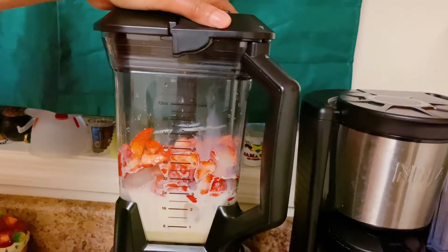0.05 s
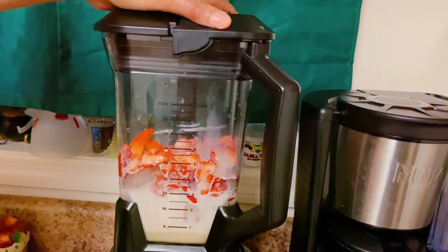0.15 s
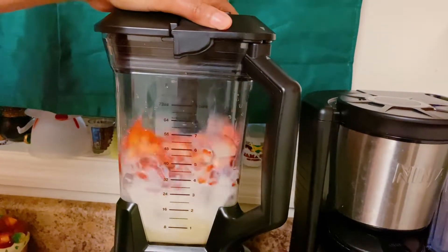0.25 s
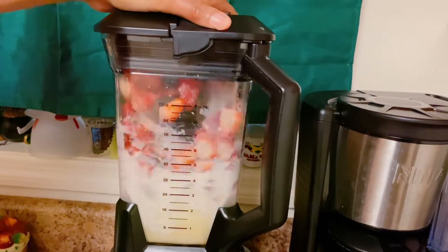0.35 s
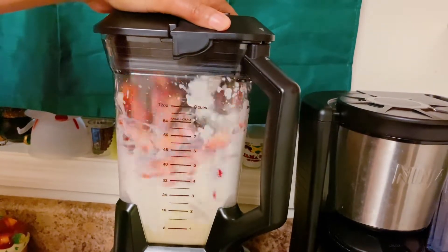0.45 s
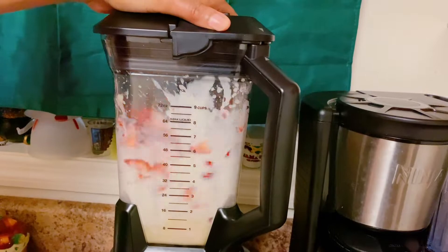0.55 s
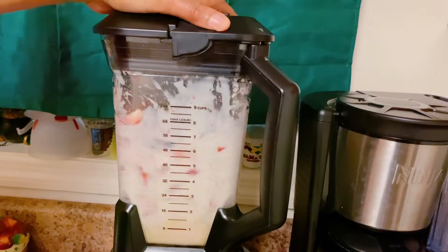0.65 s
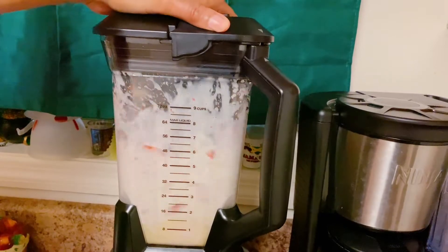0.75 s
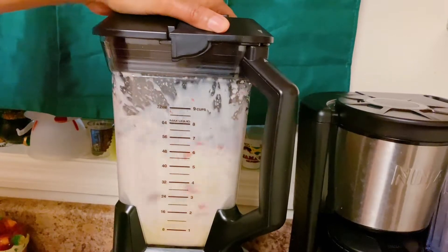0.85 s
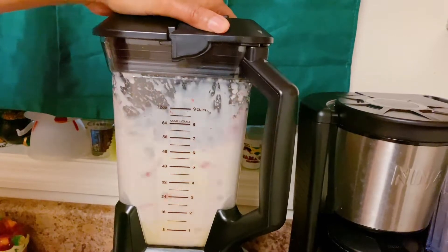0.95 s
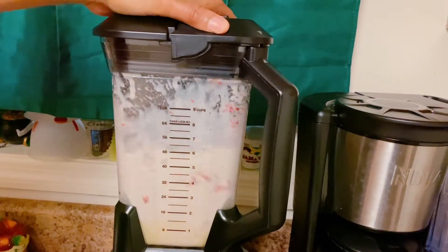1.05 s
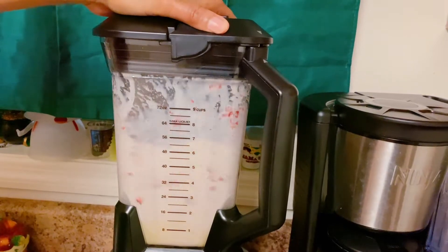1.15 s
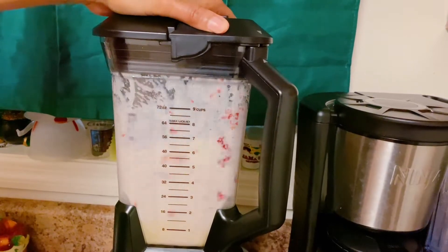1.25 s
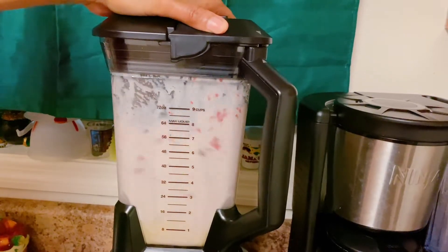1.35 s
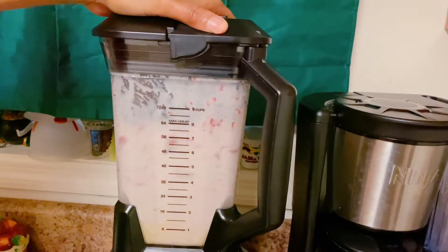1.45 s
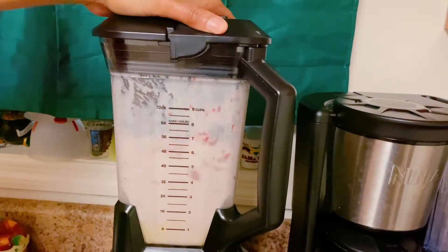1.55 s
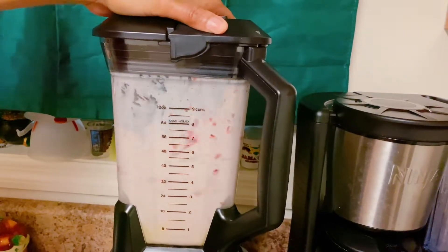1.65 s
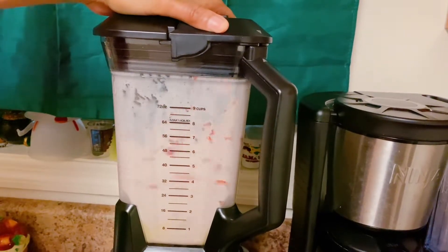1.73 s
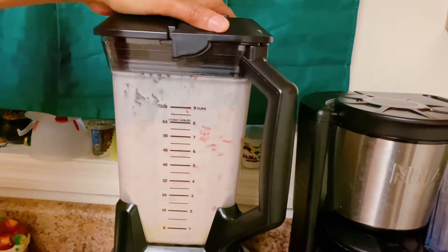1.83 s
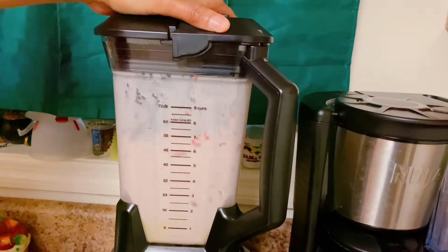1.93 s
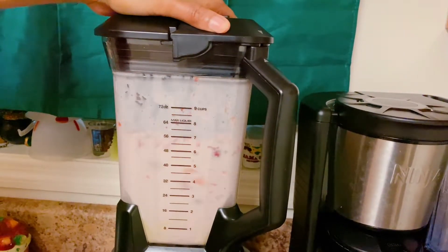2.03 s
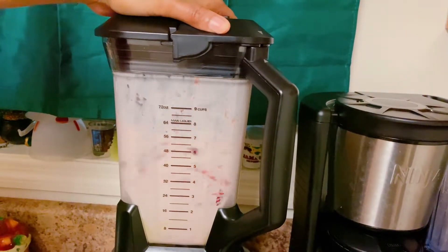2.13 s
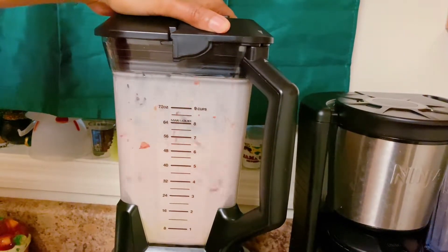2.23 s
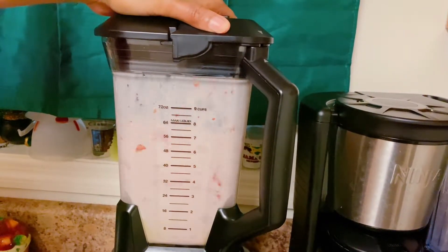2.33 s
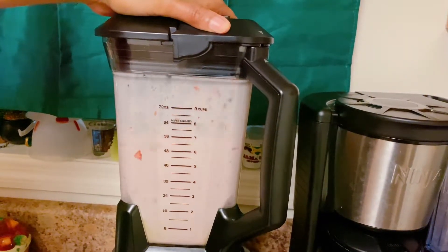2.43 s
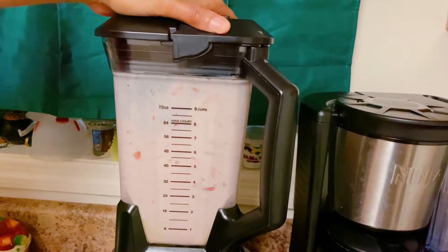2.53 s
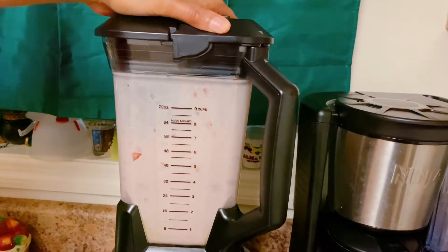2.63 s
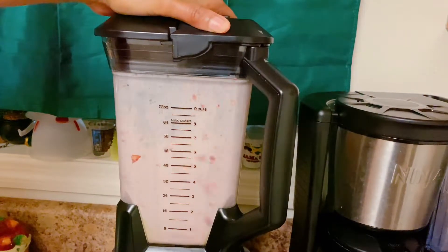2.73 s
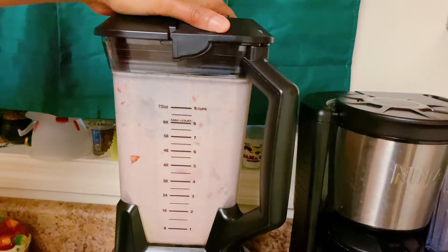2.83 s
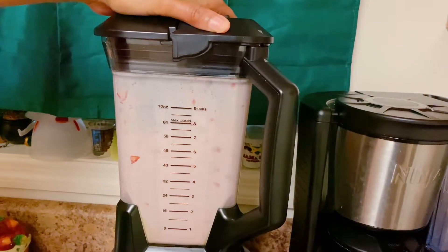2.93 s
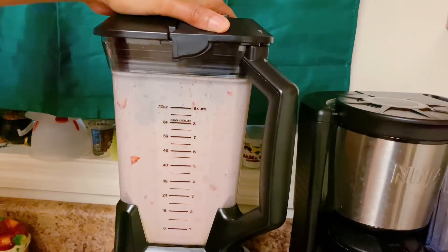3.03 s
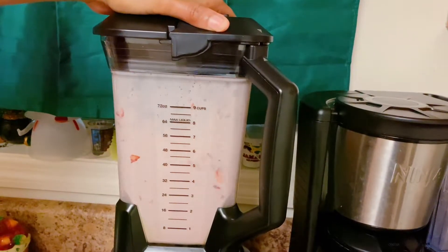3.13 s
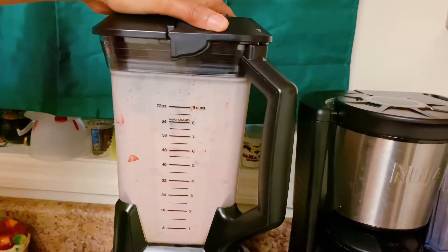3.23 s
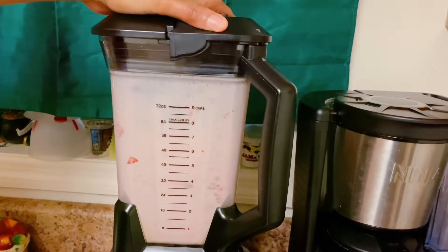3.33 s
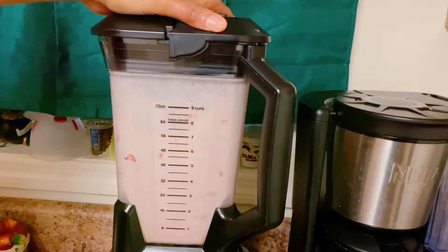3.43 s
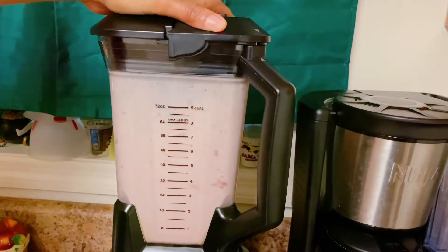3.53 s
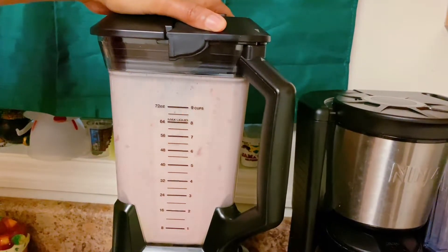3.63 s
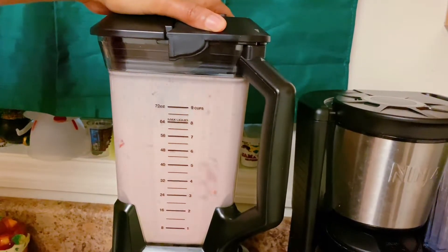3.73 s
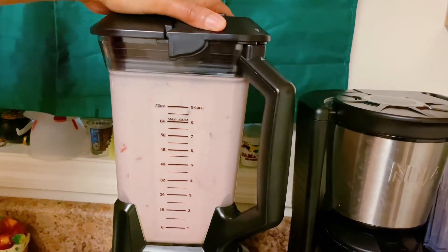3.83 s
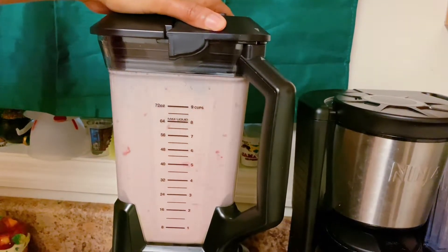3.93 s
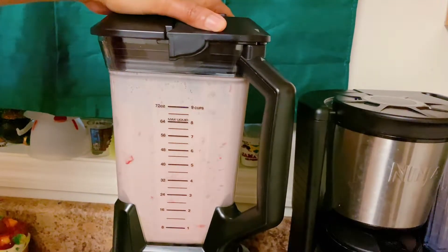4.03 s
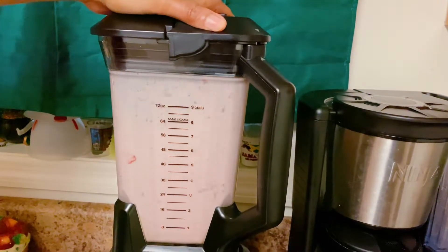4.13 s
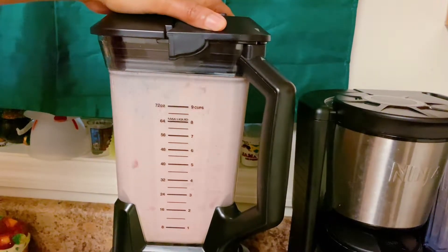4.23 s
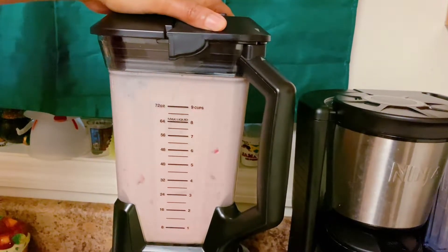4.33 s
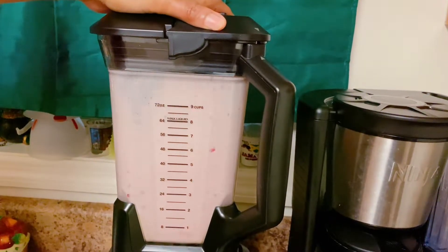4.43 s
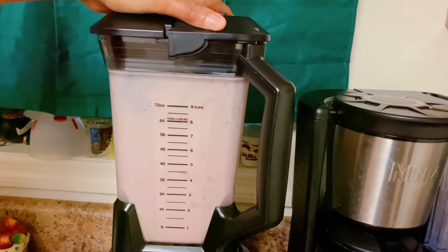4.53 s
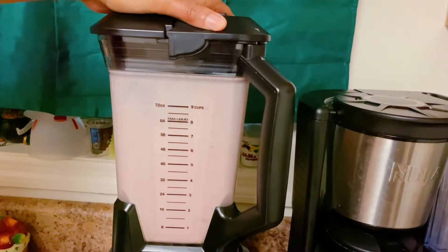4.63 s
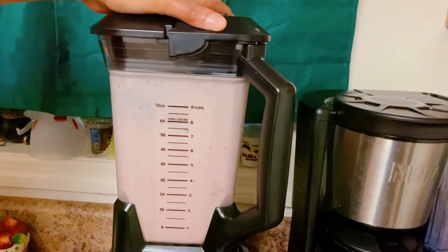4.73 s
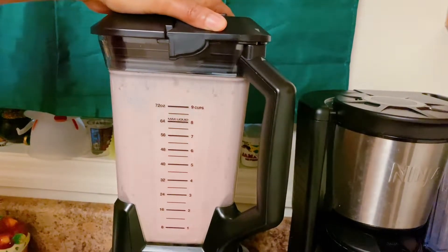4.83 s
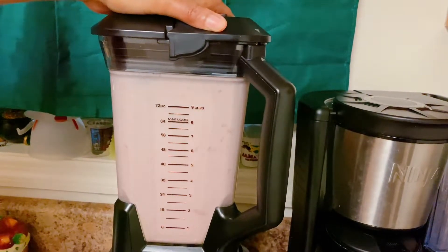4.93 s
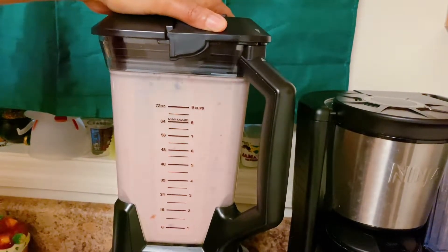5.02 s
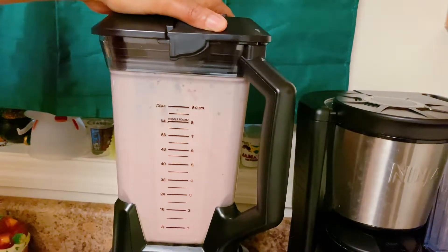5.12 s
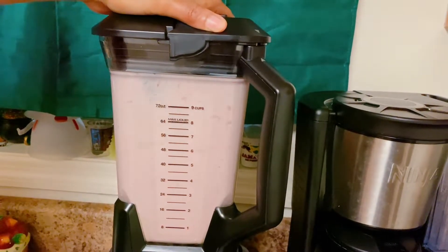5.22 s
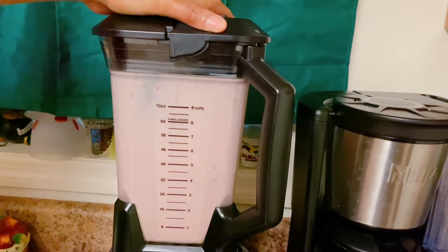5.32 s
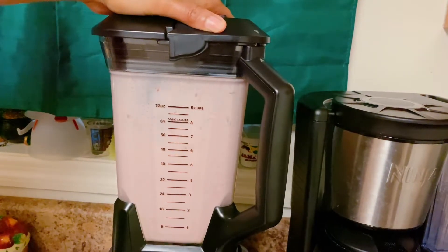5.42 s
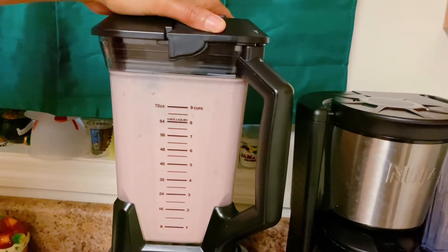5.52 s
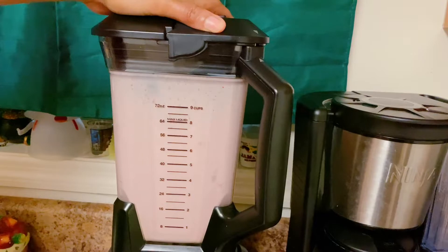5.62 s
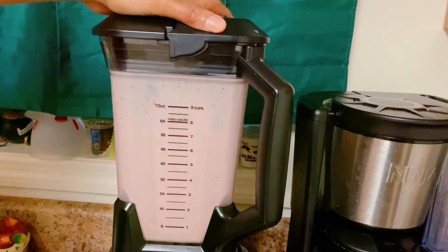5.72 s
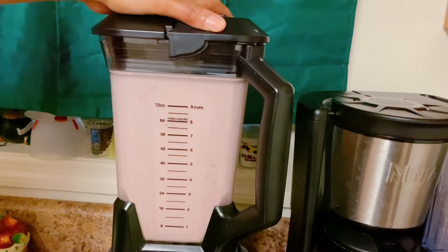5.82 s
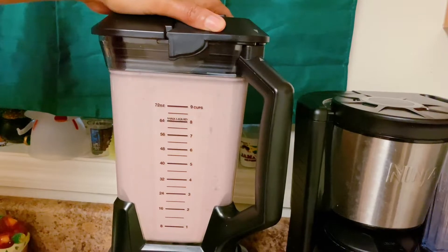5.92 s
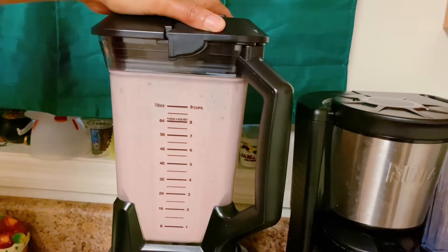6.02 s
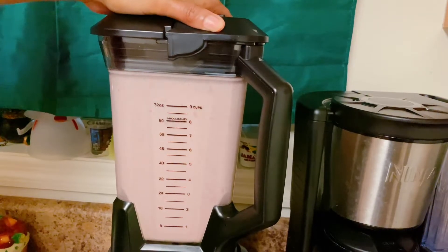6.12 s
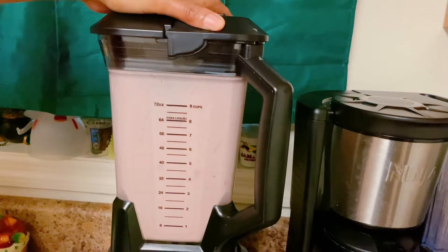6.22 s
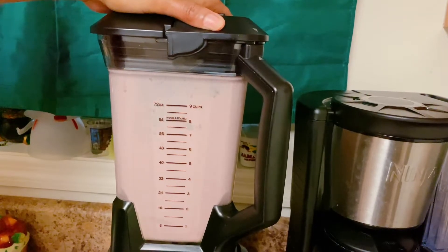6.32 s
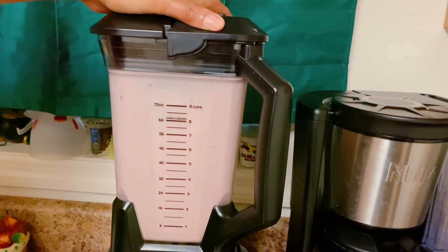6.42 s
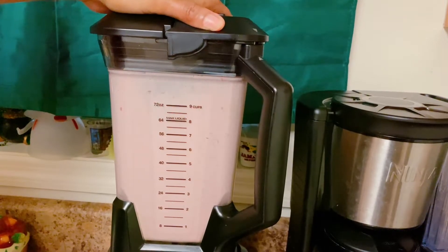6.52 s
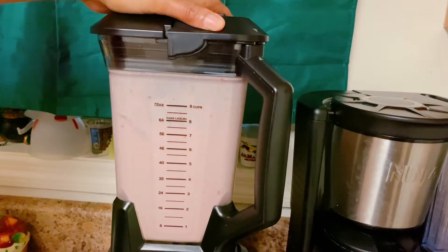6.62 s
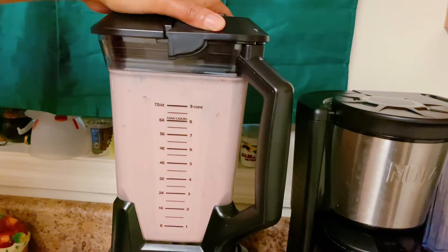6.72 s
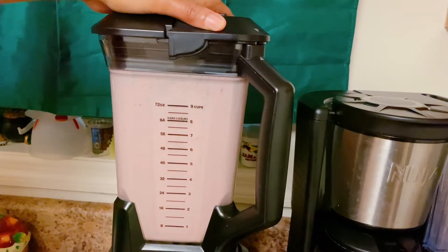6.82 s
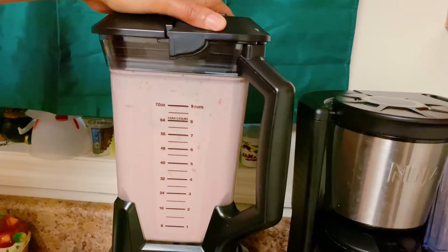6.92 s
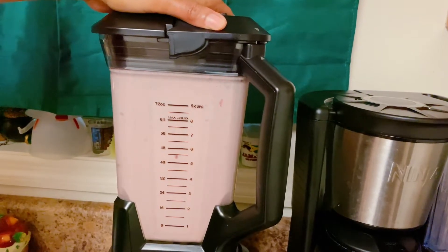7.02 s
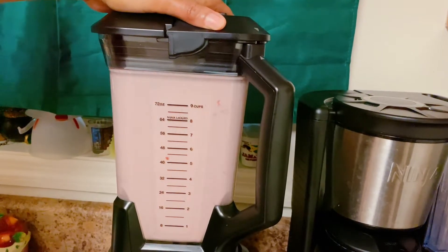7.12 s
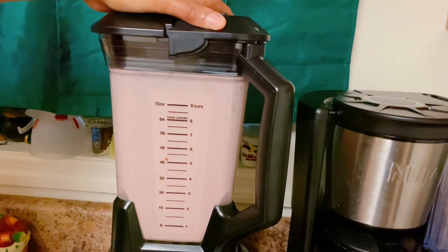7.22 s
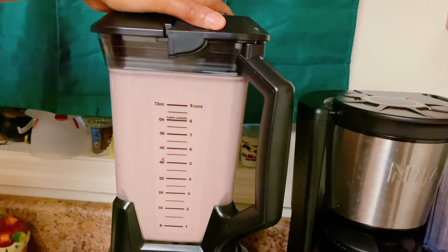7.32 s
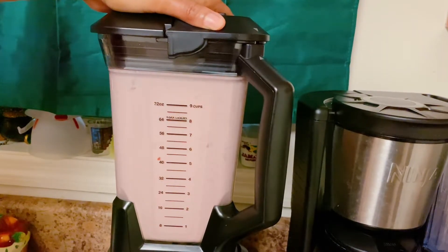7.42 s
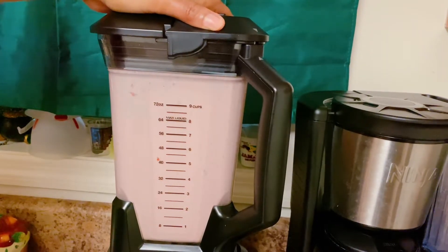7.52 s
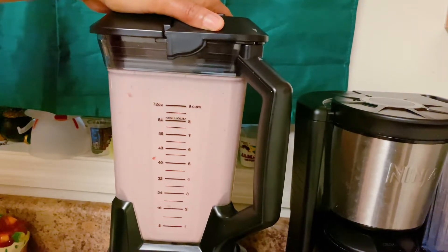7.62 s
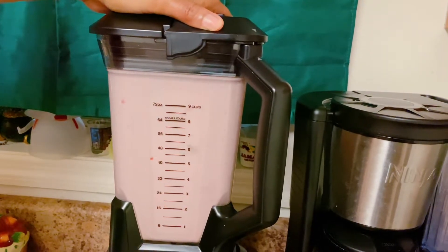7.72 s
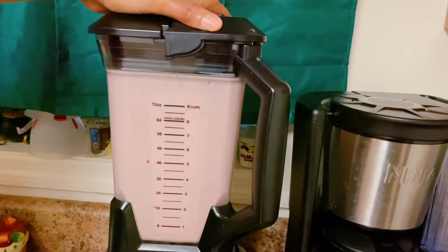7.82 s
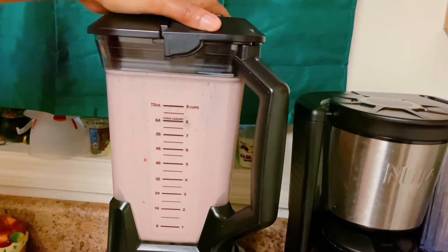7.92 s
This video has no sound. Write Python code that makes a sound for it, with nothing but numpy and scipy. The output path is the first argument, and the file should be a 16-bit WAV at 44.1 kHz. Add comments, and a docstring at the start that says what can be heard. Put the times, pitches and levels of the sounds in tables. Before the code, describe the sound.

Close up in a kitchen, a blender snaps on, crunches through ice, and roars steadily, its whine throbbing and dipping as the mix thickens.

```python
"""A countertop blender in a kitchen, close to a stereo microphone: a switch clicks, the motor spins up, ice smashes.
The whine is sine partials locked to the rotor speed; it rises, and drops as the vortex gulps.
Each gulp flares the churning roar, which is banded noise coloured by the jar's resonances.
Ice blows are clicks that ring the jar's modes. Near surfaces send echoes; behind lie fridge hum and room air."""
import sys
import numpy as np
from scipy import signal
from scipy.fft import rfft, irfft
from scipy.io import wavfile
from scipy.ndimage import uniform_filter1d

SR = 44100
rng = np.random.default_rng(int(sys.argv[2]) if len(sys.argv) > 2 else 0)


def put_to_file(sound):
    """Save the sound as 16-bit audio at rate SR, in the file named by the first command-line argument."""
    columns = np.atleast_2d(sound).T  # one column per channel
    safe = np.clip(columns, -1, 1)
    whole_steps = np.round(safe * 32767)
    wavfile.write(sys.argv[1], SR, whole_steps.astype(np.int16))


N = 351036   # samples in the scene

# The motor spins up through the ice. Each row: time in seconds, rotor speed in Hz, whine in dB,
# roar in dB before the jar's make-up gain, ice rattle in dB before it fades.
SPIN_UP = [(.195, 70.4, -37, -24, -15), (.29, 111.7, -34.5, -29, -19.5), (.42, 218, -29, -29.5, -24.5),
           (.46, 234.7, -33, -29, -28.5), (.53, 262.4, -22, -28, -28), (.62, 279.3, -36, -27.5, -25),
           (.83, 301.3, -30.5, -28, -34), (.95, 309.3, -40, -30.5, -30.5)]
# How alike the two microphone ports hear a sound. Each row: frequency in Hz, likeness from 0 to 1.
PORT_LIKENESS = [(100, 1), (290, 0.63), (640, 0.54), (1400, 0.11), (5000, 0.1), (8000, 1), (15000, 0.86)]


def from_db(db):
    """Amplitude gain of a level in dB."""
    return 10 ** (np.asarray(db) / 20)


def rms_one(x):
    """Scale to rms 1."""
    return x / np.sqrt(np.mean(x ** 2) + 1e-20)


def in_time(rows):
    """Columns of a curve whose first column is seconds, one value a sample."""
    s, *columns = np.transpose(rows)
    return [np.interp(np.arange(N) / SR, s, column) for column in columns]


def at_hz(points, hz):
    """Read a spectrum on a log frequency axis."""
    point_hz, values = np.array(points).T
    return np.interp(np.log(hz), np.log(point_hz), values)


def drift(rate_hz):
    """Slow random wander with rms 1: noise through two equal low-pass poles."""
    step = 40   # samples between computed values
    r = np.exp(-2 * np.pi * step * rate_hz / SR)
    noise = rng.standard_normal(N // step + 2002)
    slow = signal.lfilter([1], [1, -2 * r, r * r], noise)[2000:]   # drop the filter's start
    return np.interp(np.arange(N) / step, np.arange(len(slow)), rms_one(slow))


def ring(clicks, hz, t60):
    """A unit click sets off a sine of height 1 that dies by 60 dB in t60 seconds."""
    r, w = from_db(-60 / (t60 * SR)), 2 * np.pi * hz / SR
    return signal.lfilter([0, np.sin(w)], [1, -2 * r * np.cos(w), r * r], clicks + 1e-18)


def boost(x, hz, width_hz, db):
    """Lift a resonance out of the noise by adding its band-passed copy."""
    r, w = np.exp(-np.pi * width_hz / SR), 2 * np.pi * hz / SR
    peak = signal.lfilter([(1 - r * r) / 2, 0, (r * r - 1) / 2], [1, -2 * r * np.cos(w), r * r], x)
    return x + (from_db(db) - 1) * peak


def pan(x, db):
    """Two channels, the left louder by db."""
    return x * from_db([[db / 2], [-db / 2]])


def filtered(x, order, hz, kind):
    """Butterworth filter."""
    return signal.sosfilt(signal.butter(order, hz, kind, fs=SR, output="sos"), x)


def whine(rotor_hz, whine_db):
    """Unbalance shakes the base once a turn; a weaker partial an octave up grows as the ice breaks down."""
    octave_db, octave_pan_db = -43, 23   # the octave is heard mostly on the left
    up_to_speed = np.clip(rotor_hz / 310, 0, 1)
    jolts = 1.58 + 6.3 * (1 - up_to_speed)   # ice blows break up the tone while the rotor is slow
    unsteady_hz = rotor_hz * (1 + 0.0014 * jolts * drift(25.0))
    turns = 2 * np.pi * np.cumsum(unsteady_hz) / SR
    first = from_db(whine_db + jolts * drift(32)) * np.sqrt(2) * np.sin(turns)

    grows = np.clip(np.arange(N) / SR / 2, 0, 1)   # over two seconds
    second = from_db(octave_db + 2.1 * drift(14.85)) * grows * np.sqrt(2) * np.sin(2 * turns)
    slowing = np.minimum(np.gradient(rotor_hz) * SR, 0)   # Hz per second
    second = second * from_db(0.011 * slowing)   # the octave fades while the rotor is braked
    return pan(first, 3.2) + pan(second, octave_pan_db)


def shaft(rotor_hz):
    """Wavering tones that follow the speed, come clear at full speed and change balance as the mix thickens."""
    # The blade shaft turns at about a fifth of the rotor's speed and adds faint tones.
    # Each row: multiple of the rotor speed, level in dB in the thin mix, level in dB in the thick mix.
    shaft_tones = [(0.395, -43, -52.5), (0.591, -55.5, -42), (0.801, -48.5, -45), (1.199, -55.5, -47),
                   (1.58, -49.5, -58.5)]
    thin_s, thick_s = 1.46, 5.3   # the mix thickens between these times
    turns, t = 2 * np.pi * np.cumsum(rotor_hz) / SR, np.arange(N) / SR
    tones = 0
    for multiple, thin_db, thick_db in shaft_tones:
        level_db = np.interp(t, [thin_s, thick_s], [thin_db, thick_db]) + 3.05 * drift(6.7)
        phase = multiple * turns + 1.03 * drift(5.2)
        tones = tones + from_db(level_db) * np.sqrt(2) * np.sin(phase)
    return pan(np.clip(t / thin_s, 0, 1) * tones, 4.4)


def thumps(rotor_hz):
    """The base jolts the counter when the rotor is braked: low noise swells with the loss of speed."""
    thump_db = -51   # at a braking of 350 Hz per second, if held
    braking = np.clip(-np.gradient(rotor_hz) * SR / 350, 0, 1.5) ** 2
    swell = signal.lfilter([.0005], [1, -.9995], braking)   # smoothed over some 45 ms
    low = filtered(rng.standard_normal(N), 2, [25, 95], "band")
    return from_db(thump_db) * swell * rms_one(low)


def gulps():
    """The vortex gulps, each braking the rotor: summed loss of speed in Hz, whine swell as gain, roar flare in dB."""
    # Quick throbs first, slower and harder as the mix thickens. Each row: time in seconds, whine swell in dB,
    # width of the swell in seconds, flare of the roar in dB, peak loss of speed in Hz.
    gulp_rows = [(1.012, -25.5, 0.055, 1, 10.2), (1.275, -21, 0.037, 2.5, 6),
                 (1.41, -28, 0.032, -0.5, 0.89), (1.489, -21, 0.033, 1.5, 7.5), (1.7, -22.5, 0.09, 0.5, 5),
                 (1.894, -25, 0.05, 0, 4.76), (2.05, -26, 0.031, 0, 1.9), (2.207, -23.5, 0.042, 2, 6.5),
                 (2.38, -22.5, 0.04, 2.5, 7.6), (2.545, -26, 0.056, 1.5, 6.7), (2.718, -24, 0.042, 3, 10.2),
                 (2.865, -23.5, 0.031, 2.5, 12.8), (3.035, -22, 0.039, 2.5, 13.6),
                 (3.176, -26, 0.036, 3, 10.5), (3.337, -20.5, 0.036, 3, 12.8), (3.505, -23, 0.041, 3, 13),
                 (3.66, -24.5, 0.046, 2.5, 11.3), (3.808, -22.5, 0.03, 4.5, 29), (3.963, -24, 0.04, 3, 9),
                 (4.106, -22, 0.041, 3.5, 22), (4.265, -24, 0.07, 2.5, 12), (4.432, -21.5, 0.043, 4, 21.3),
                 (4.571, -26, 0.064, 2.0, 3), (4.738, -20.5, 0.029, 5.0, 32.5),
                 (4.889, -24.5, 0.031, 1.5, 6.3), (5.039, -23.5, 0.034, 6.5, 53),
                 (5.323, -35.5, 0.039, 4.5, 17), (5.418, -23.5, 0.085, 3, 10.3),
                 (5.659, -21, 0.03, 5, 35.7), (5.804, -29, 0.026, 0.5, 1), (5.953, -21.5, 0.036, 5.5, 46),
                 (6.299, -24, 0.053, 4.0, 40), (6.603, -28.5, 0.039, 2.5, 17),
                 (6.682, -27.5, 0.051, 1, 2.03), (6.904, -23.5, 0.044, 5, 34),
                 (7.035, -26, 0.019, 0.5, 2.38), (7.205, -21.5, 0.029, 5, 31),
                 (7.313, -25.5, 0.055, 1.5, 3.5), (7.51, -23, 0.031, 5.5, 46.5),
                 (7.645, -32, 0.06, 1.5, 4.9), (7.84, -25.5, 0.043, 6.5, 54)]
    whine_lag_s, flare_width_s = 0.013, 0.027   # the swell follows the flare
    brake_lead_s, brake_s, recover_s = 0.03, .075, .14   # braking starts just before the flare
    fall_share = 0.8   # a swell falls quicker than it rises
    s, whine_db, width_s, flare_db, loss_hz = np.transpose(gulp_rows)[:, :, None]
    t = np.arange(0, N + 50, 50) / SR   # every 50th sample is enough
    since = np.maximum(t - s + brake_lead_s, 0)
    loss = loss_hz * np.minimum(since / brake_s, np.exp((brake_s - since) / recover_s))
    past = (t - s - whine_lag_s) / width_s
    past = np.where(past > 0, past / fall_share, past)
    swell = from_db(whine_db) * np.exp(-.5 * past ** 2)
    flare = flare_db * np.exp(-.5 * ((t - s) / flare_width_s) ** 2)
    return in_time(np.transpose([t, loss.sum(axis=0), swell.sum(axis=0), flare.sum(axis=0)]))


def banded_noise(spectrum, shared_db, own_db, surge_db=0):
    """Third-octave bands of flickering stereo noise; the surge lifts the treble fully, the bass little."""
    # Balance between the microphone ports. Each row: frequency in Hz, left minus right in dB.
    port_lean = [(60, 3.5), (380, -2.5), (700, 7), (2380, 2), (15000, -0.5)]
    treble_lag, lag_from_hz = 12, 6000   # samples by which the treble reaches the left port later
    out, together, edges = 0, drift(30), 42 * 2 ** (np.arange(27) / 3)
    white = rng.standard_normal((2, 2, N))   # neighbouring bands draw on different noise
    for k, (low, high) in enumerate(zip(edges, edges[1:])):
        mid, side = filtered(white[k % 2], 2, [low, high], "band")
        hz = np.sqrt(low * high)
        alike = np.clip(at_hz(PORT_LIKENESS, hz), 0, 1)
        follows = np.clip(np.log(hz / 80) / np.log(1200 / 80), 0, 1.1)
        common_db = follows * (surge_db + shared_db * together)
        gain = from_db(at_hz(spectrum, hz) + common_db + own_db * drift(17.5))
        stereo = np.sqrt(1 + alike) * mid + np.sqrt(1 - alike) * side * [[1], [-1]]
        band = pan(stereo, at_hz(port_lean, hz))
        if hz > lag_from_hz:
            band[0] = np.roll(band[0], treble_lag)
        out = out + gain * band
    return out


def roar(roar_db):
    """Blades churning the mix, gears and cooling air: banded noise coloured by the jar's resonances."""
    # Spectrum of the roar. Each row: frequency in Hz, relative density in dB per Hz.
    roar_spectrum = [(45, -65), (70, -26), (130, -20), (270, -13), (400, -16), (650, -16), (1100, -16),
                     (1500, -21), (2600, -20.5), (4240, -23.5), (7400, -32), (9000, -35), (11000, -31),
                     (15500, -40.5)]
    # Jar and housing resonances. Each row: frequency in Hz, width in Hz, boost in dB.
    jar_resonances = [(240.6, 20, 7), (957, 150, 4), (1235, 25, 6.5), (1841, 46, 8.5), (2430, 48, 6),
                      (2684, 170, 4), (3310, 210, 3), (4270, 62, 5), (5910, 260, 5.5)]
    usual_db = np.median(roar_db)
    noise = banded_noise(roar_spectrum, shared_db=0.63, own_db=1.35, surge_db=roar_db - usual_db)
    for hz, width_hz, db in jar_resonances:
        noise = boost(noise, hz, width_hz, db)
    usual_power = np.median(uniform_filter1d(noise[0] ** 2, size=4000))
    return from_db(usual_db + 5.5) * noise / np.sqrt(usual_power)


def ice(rattle_db, per_s):
    """Chunks hit blades and wall at random; each blow shakes the jar's modes unevenly, differently at each port."""
    # What ice blows set ringing in the jar. Each row: frequency in Hz, relative level in dB, t60 in seconds.
    jar_modes = [(242, -2.5, 0.11), (405, -4, 0.019), (830, -1, 0.0079), (1063, -5.5, 0.019),
                 (1250, -3, 0.0084), (2530, -2.5, 0.0034), (4260, -12, 0.0014), (100, -17, 0.11)]
    # Single loud blows. Each row: time in seconds, relative level of the crack in dB, thud in dB.
    big_chunks = [(0.196, -10, -13.5), (.237, -12, -14), (0.28, -12, -27), (0.336, -18, -22),
                  (.358, -19, -14), (0.412, -18, -16.5), (.424, -11, -25), (0.494, -14, -30),
                  (0.516, -9.5, -29), (0.56, -8, -17.5), (.679, -10, -24), (0.914, -6, -19),
                  (1.003, -14, -39), (1.295, -10.5, -30), (2.839, -9, -25)]
    rattle_fade_s = 0.73
    blow_tilt_db = 3   # a short hard blow favours the high modes, dB per octave
    born = np.flatnonzero(rng.random(N) < per_s / SR)
    sizes = from_db(3.2 * np.minimum(rng.exponential(1, len(born)), 3.0))
    since_spin_up = np.maximum(np.arange(N) / SR - SPIN_UP[-1][0], 0)
    ground_down = np.exp(-since_spin_up / rattle_fade_s)

    big, thud = np.zeros((2, N))
    s, crack_db, thud_db = np.transpose(big_chunks)
    at = (s * SR).astype(int)
    big[at], thud[at] = from_db(crack_db), from_db(thud_db)
    # a chunk shatters over some milliseconds
    crunch = rms_one(rng.standard_normal(600) * np.exp(-np.arange(600) / 110)) * 0.1
    big = signal.fftconvolve(big, filtered(crunch, 1, [800, 8000], "band"))[:N]

    rattle, blows = np.zeros((2, N)), np.zeros(N)
    for hz, level_db, t60 in jar_modes:
        clicks = np.zeros((2, N))
        common, own = rng.standard_normal(len(born)), rng.standard_normal((2, len(born)))
        alike = np.clip(at_hz(PORT_LIKENESS, hz), 0, 1)
        clicks[:, born] = sizes * (np.sqrt(alike) * common + np.sqrt(1 - alike) * own)
        rattle += from_db(level_db) * rms_one(ring(clicks, hz, t60))
        blow_db = level_db - 14.5 + blow_tilt_db * np.log2(hz / 1000)
        blows += from_db(blow_db) * ring(big, hz, t60)
    # the push of a heavy chunk rings the jar's lowest strong mode
    blows += ring(thud, jar_modes[0][0], jar_modes[0][2])
    hits = from_db(rattle_db) * ground_down * rms_one(rattle) + blows + big
    return pan(filtered(hits, 2, 70, "high"), 3.6)


def button():
    """Dying noise bursts, each ringing at the pitch of the part that moves."""
    # Contact, snap, knock of the panel, tail in the room, latch.
    # Each row: time in seconds, level in dB before filtering and ringing, decay in seconds, pitch in Hz.
    button_parts = [(0.0972, -33, 0.001, 3050), (0.0997, -34, 0.001, 3100), (0.1005, -37, 0.012, 920),
                    (0.102, -47, 0.045, 3180), (0.175, -42, 0.002, 1620)]
    pitch_q, ring_db = 14.0, 28   # sharpness and height of each pitch
    t, clack = np.arange(SR) / SR, 0
    for s, db, decay, hz in button_parts:
        shape = from_db(db) * (t > s) * np.exp(-np.maximum(t - s, 0) / decay)
        burst = signal.lfilter([.5, -.5], [1, -.85], shape * rng.standard_normal((2, SR)) + 1e-18)
        clack = clack + boost(burst, hz, hz / pitch_q, ring_db)
    return np.pad(clack, [(0, 0), (0, N - SR)])


def echoes(x):
    """Counter, wall and cupboards close by send dull copies, other ones to each port: a fine ripple in the colour."""
    echo_db = -21   # each copy
    dull = filtered(x, 2, [400, 6000], "band")
    out = x.copy()
    lags = (rng.uniform(0.002062, .02, size=12) * SR).astype(int)
    for k, lag in enumerate(lags):
        sign = (-1) ** (k // 2)
        out[k % 2, lag:] += from_db(echo_db) * sign * dull[k % 2, :-lag]
    return out


def kitchen():
    """Background: fridge hum as steady sines over dull room air, which is shaped noise."""
    # Fridge hum. Each row: frequency in Hz, rms level in dB.
    fridge_partials = [(59.2, -61), (118.4, -61), (236.9, -60), (403.7, -71), (559.9, -72)]
    # Room air. Each row: frequency in Hz, relative density in dB per Hz.
    air_spectrum = [(40, -6), (480, -11), (1200, -26), (3000, -55)]
    air_db = -61   # rms
    t = np.arange(N) / SR
    hum = sum(from_db(db) * np.sqrt(2) * np.sin(2 * np.pi * hz * t) for hz, db in fridge_partials)
    hz = np.maximum(np.fft.rfftfreq(N, 1 / SR), 1)
    air = irfft(rfft(rng.standard_normal(N)) * from_db(at_hz(air_spectrum, hz)), N)
    return hum + from_db(air_db) * rms_one(air)


def scene():
    """The blender comes in just after the switch, over the kitchen; only jar sounds get the echoes."""
    # Full speed between gulps. Each row: time in seconds, rotor speed in Hz,
    # roar in dB before the jar's make-up gain.
    running = [(1.498, 316.3, -29.5), (2, 326.2, -30), (3, 333.4, -31), (4.5, 336.9, -31), (6, 342.6, -31),
               (7.96, 345, -31.5)]
    switch_on_s, whine_rest_db = 0.1836, -38.5   # whine between gulps
    loss_hz, swell, flare_db = gulps()
    spinning_up = [row[:4] for row in SPIN_UP]
    at_speed = [(s, hz, whine_rest_db, db) for s, hz, db in running]
    free_hz, whine_db, roar_db = in_time(spinning_up + at_speed)
    rotor_hz = free_hz - loss_hz
    whine_db = 20 * np.log10(from_db(whine_db) + swell)
    rattle_db = in_time(SPIN_UP)[3]
    powered = np.clip((np.arange(N) / SR - switch_on_s) / 0.012, 0, 1)
    jar = echoes(powered * (roar(roar_db + flare_db) + ice(rattle_db, per_s=600)))
    base = powered * (whine(rotor_hz, whine_db) + shaft(rotor_hz) + thumps(rotor_hz))
    return jar + base + button() + kitchen()


def record(dry):
    """The microphone drops the deepest bass; the highest peaks are rounded; the top is cut."""
    cutoff_hz, ceiling = 15800, .65
    dry = ceiling * np.tanh(filtered(dry, 3, 45, "high") / ceiling)
    return signal.sosfilt(signal.ellip(12, .3, 80, cutoff_hz, fs=SR, output="sos"), dry)


dry = scene()
out = record(dry)
put_to_file(out)
```